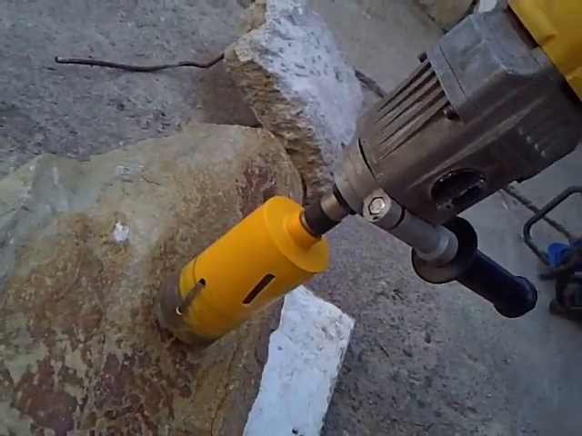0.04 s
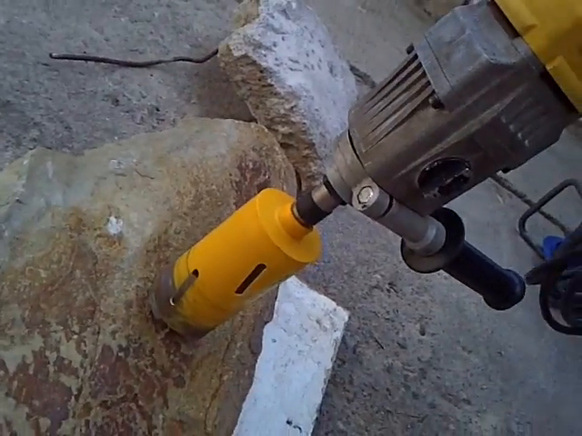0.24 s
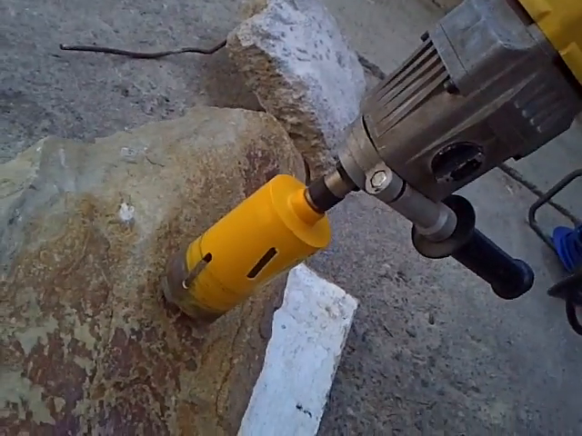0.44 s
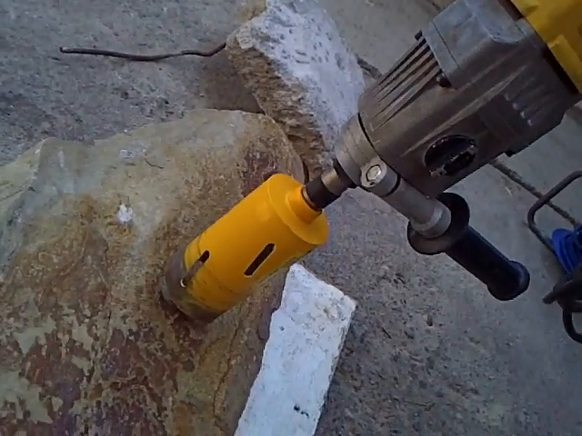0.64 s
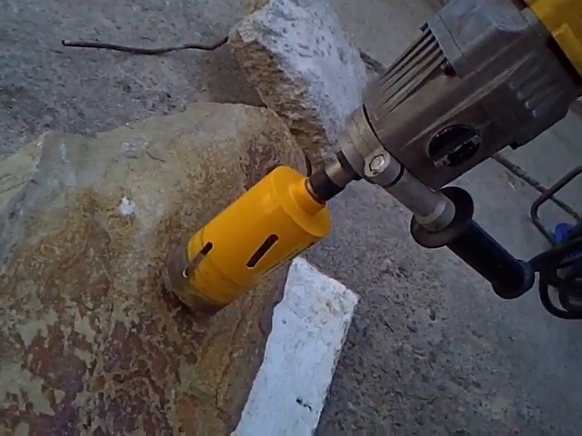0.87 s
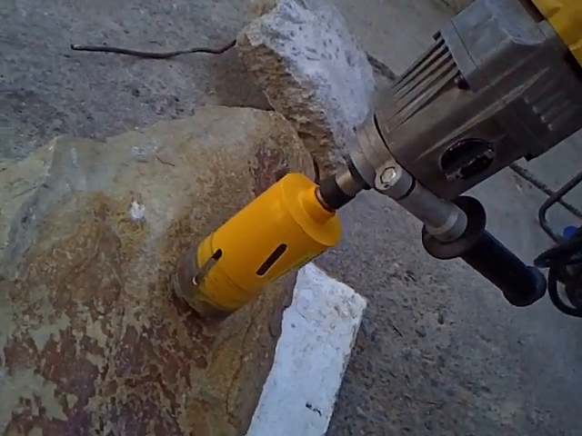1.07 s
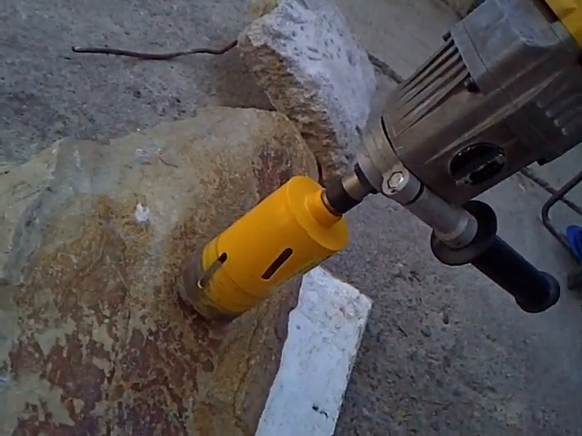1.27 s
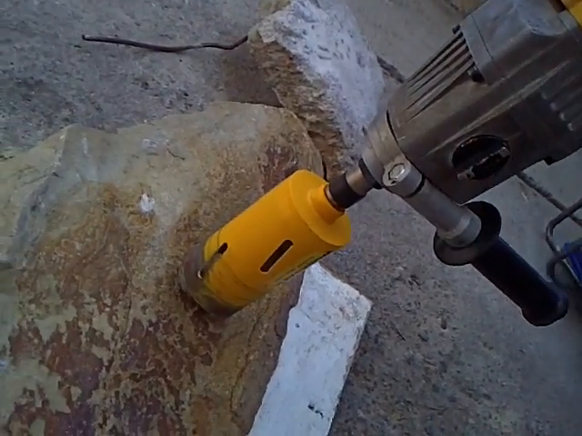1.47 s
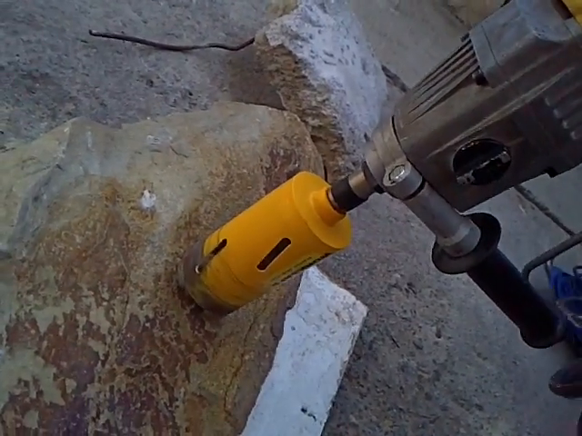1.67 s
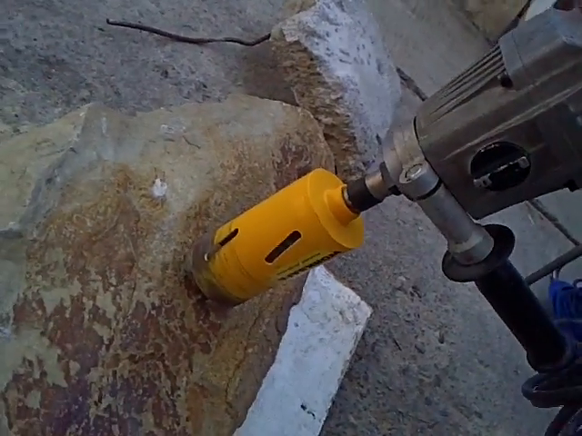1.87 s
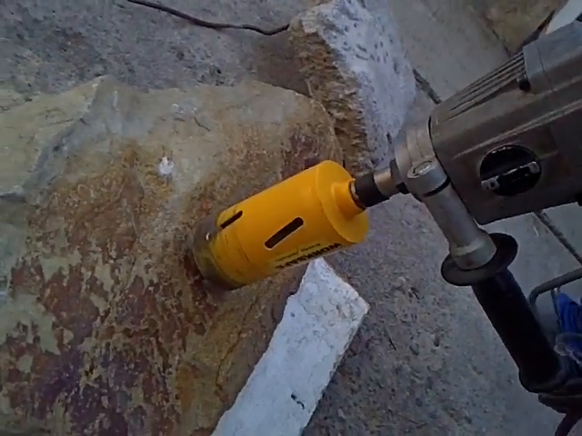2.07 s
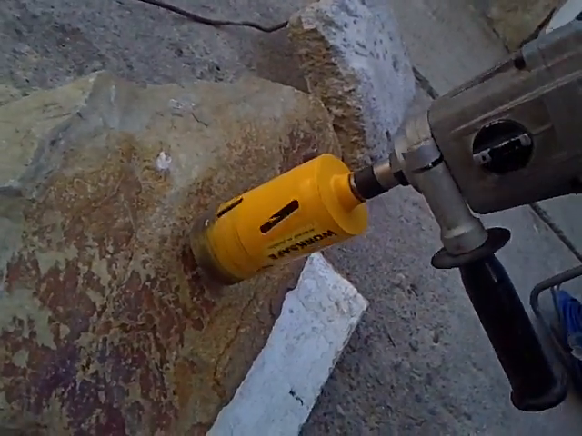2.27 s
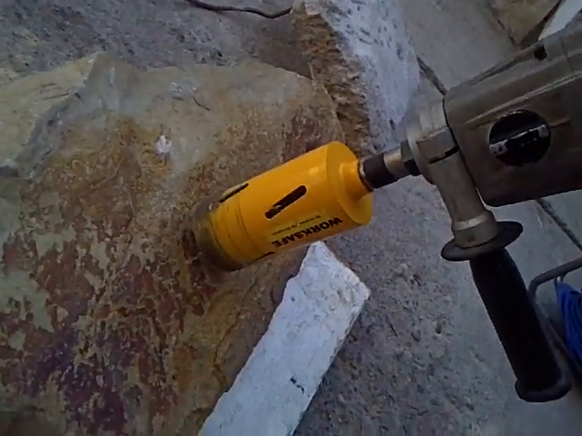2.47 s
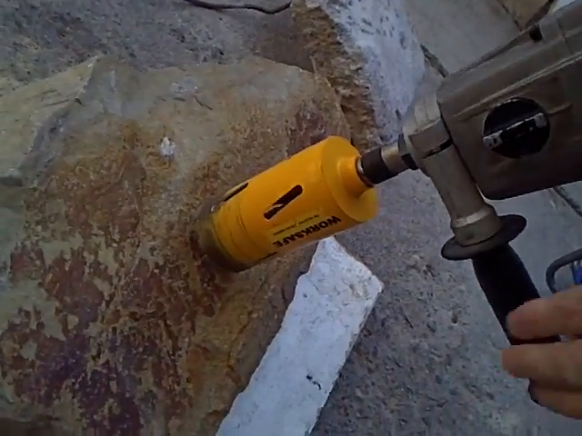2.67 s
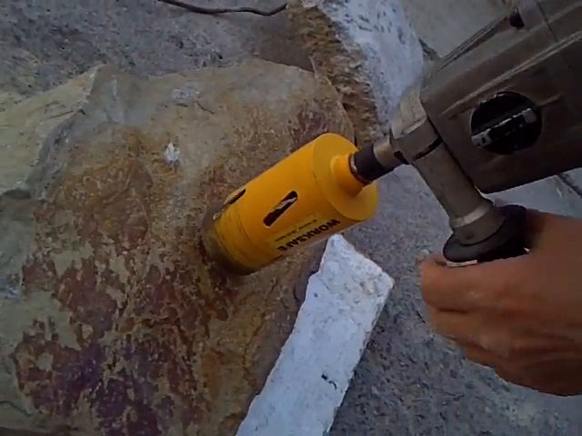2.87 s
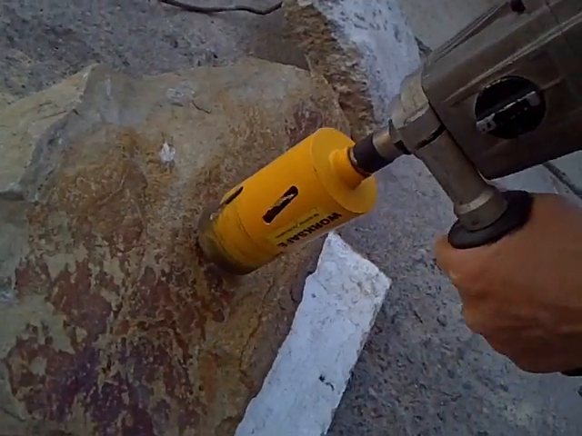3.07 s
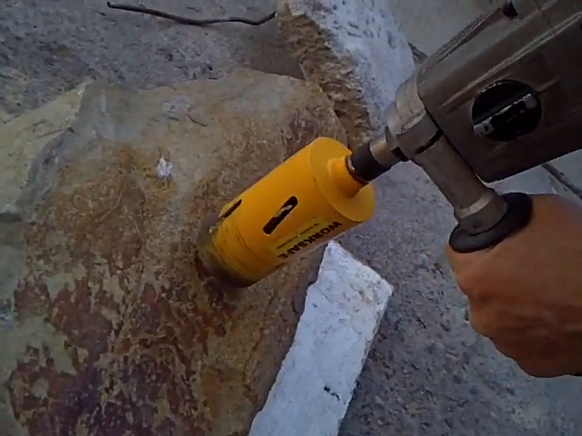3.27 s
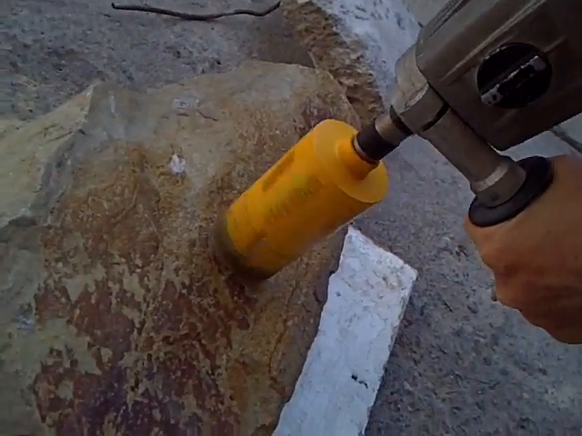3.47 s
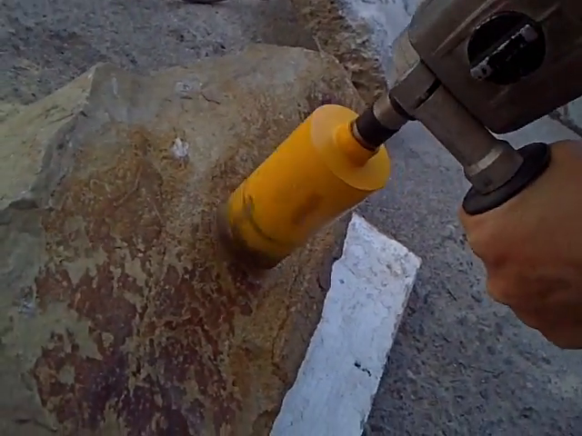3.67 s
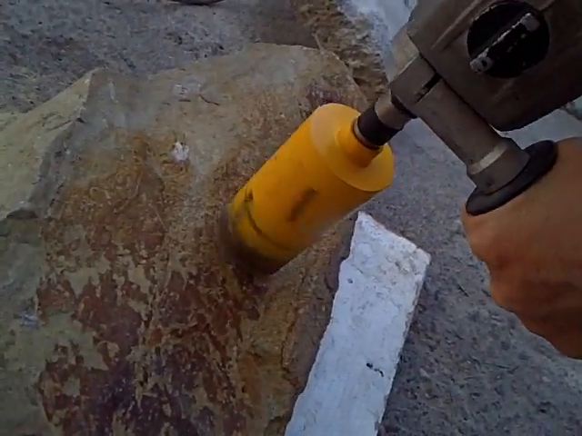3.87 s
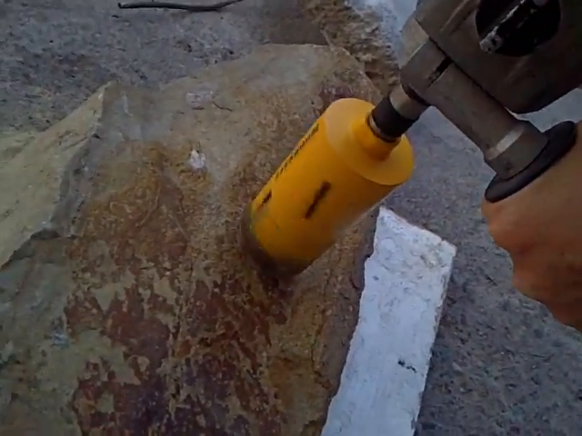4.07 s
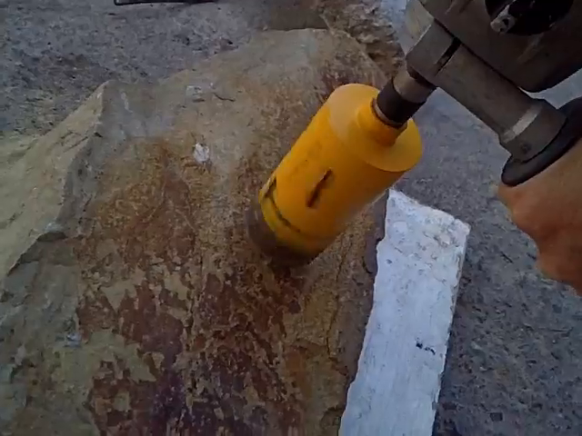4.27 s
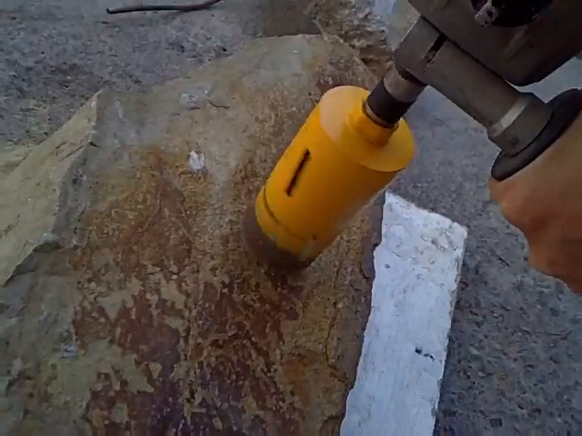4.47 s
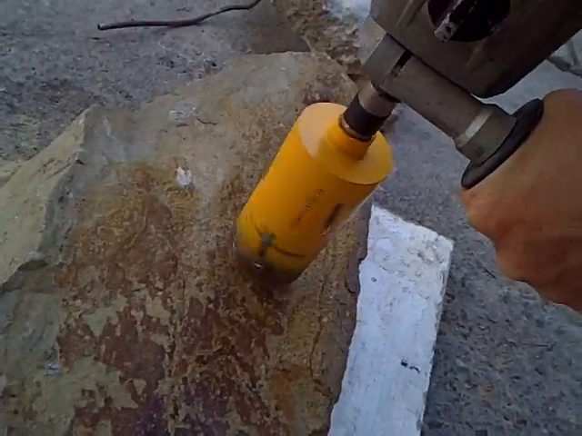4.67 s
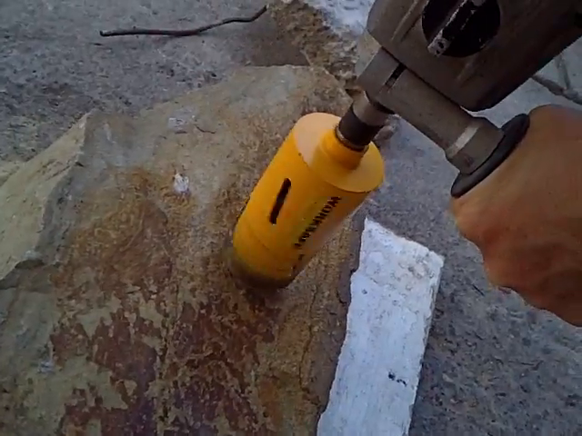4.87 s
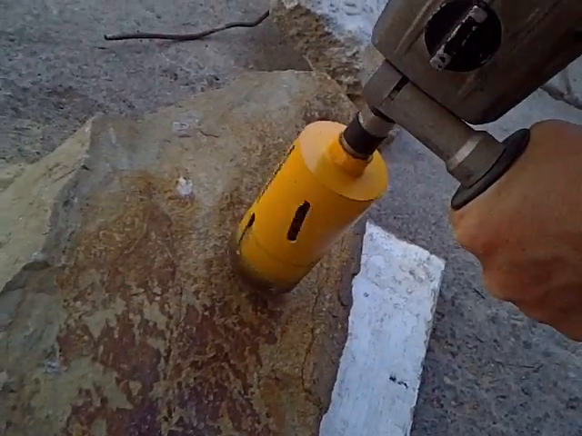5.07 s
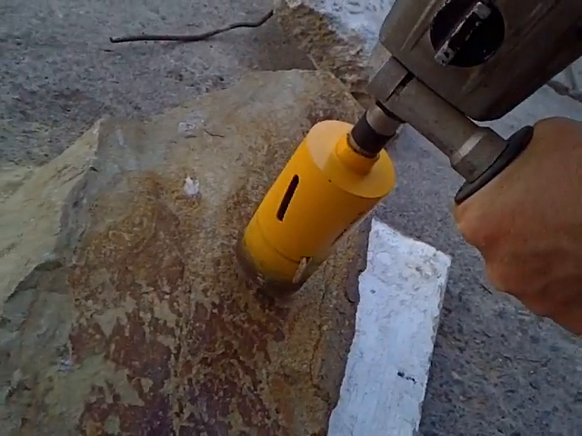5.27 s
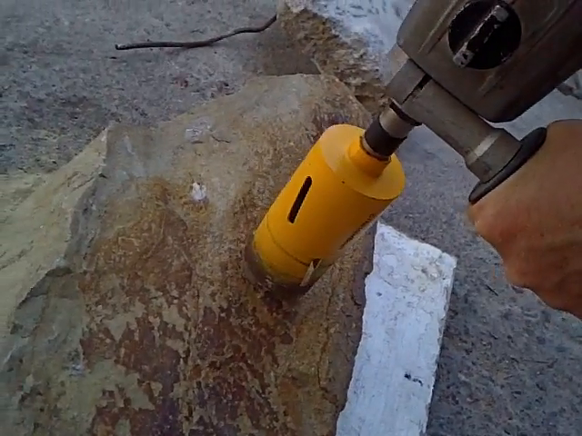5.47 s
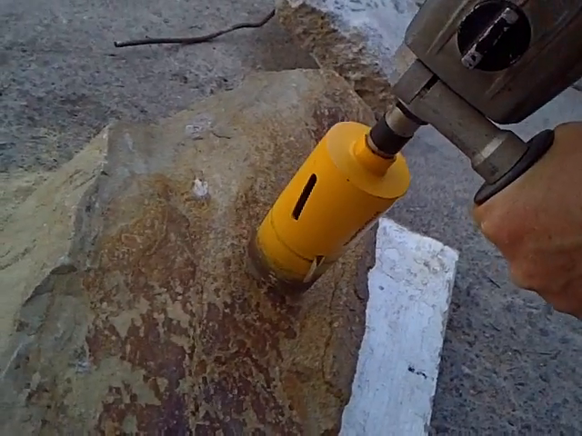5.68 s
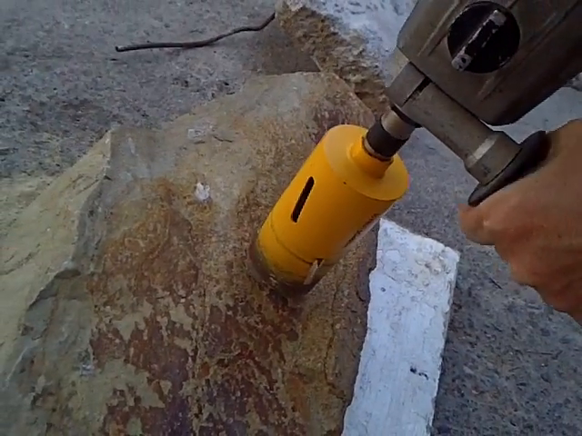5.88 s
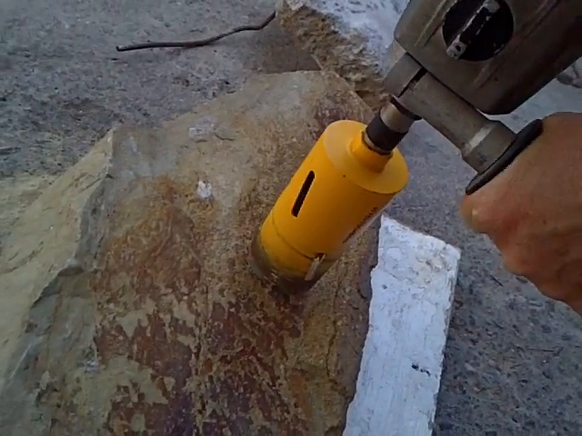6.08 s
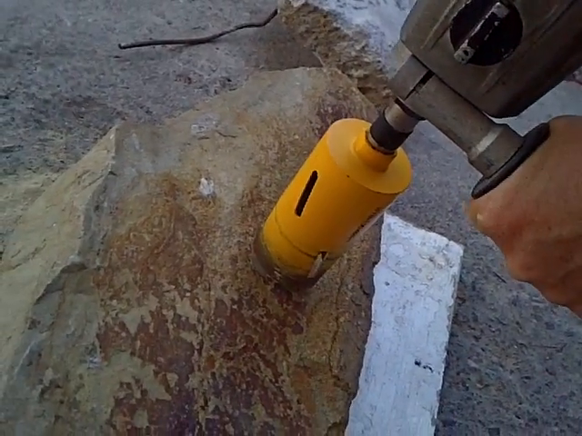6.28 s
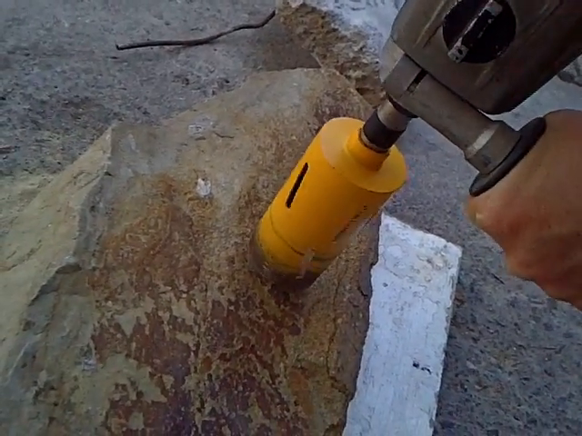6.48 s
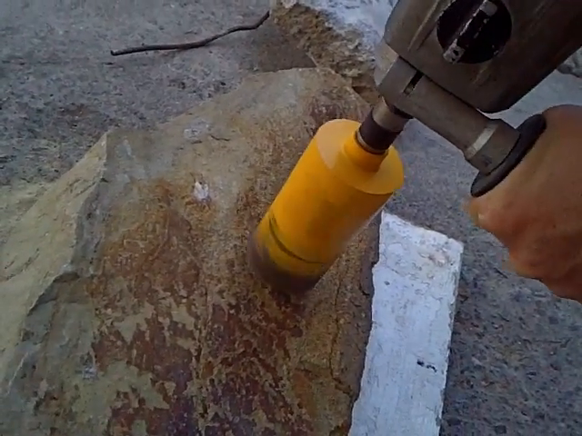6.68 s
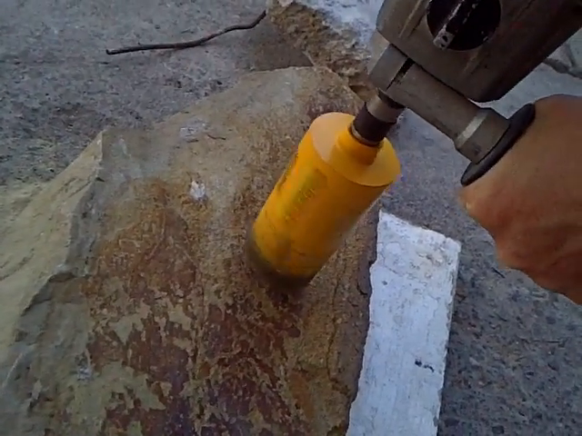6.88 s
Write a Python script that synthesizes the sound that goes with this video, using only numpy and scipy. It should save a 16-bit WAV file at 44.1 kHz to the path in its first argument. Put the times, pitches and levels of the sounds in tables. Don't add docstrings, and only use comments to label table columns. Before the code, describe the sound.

Dull thuds and stony scraping come first, with a sharp heavy clack and more grit and ticks as the tool is set down. Then a violent short burst of drilling, its whine climbing fast, gives way to a falling, rattling grind that breaks into separate bites and stops. Quiet yard hush, slight scrapes, then a second loud burst. Near microphone with dulled treble, overloading at the peaks.

```python
import sys
import numpy as np
from scipy import signal
from scipy.fft import rfft, irfft
from scipy.io import wavfile
from scipy.ndimage import uniform_filter1d

SR = 44100
rng = np.random.default_rng(int(sys.argv[2]) if len(sys.argv) > 2 else 0)


def log_audio(samples):
    frames = np.atleast_2d(samples).T
    limited = np.clip(frames, -1, 1)
    pcm = np.round(limited * 32767).astype(np.int16)
    wavfile.write(sys.argv[1], SR, pcm)


def natural_amplitude(level_db):
    exponent = np.asarray(level_db, float) / 20
    return 10 ** exponent


N = 305613
T = np.arange(N) / SR

# f/Hz, level/dB per Hz
AIR_SPECTRUM = [(20, 3.5), (60, 2), (180, -2.5), (280, -1.5), (540, -4), (950, -9), (1620, -12),
                (2260, -9.5), (3400, -28), (4200, -6.5), (6000, -17.5), (7500, -9), (10000, 4.5),
                (14000, 1.5)]
# f/Hz, level/dB
MIC_RESPONSE = [(20, -40), (90, -7), (150, 1), (4250, -1), (4600, 5), (5250, 0.5), (7000, -10),
                (10000, -18), (13000, -29.5), (15000, -41), (15600, -88)]
# f/Hz, width/Hz
MIC_NOTCHES = [(4780, 660), (5800, 1670), (8480, 2330), (12000, 1920), (14100, 250), (14800, 150)]

# f/Hz, width/Hz, level/dB
STONE_LOW = [(287, 142, -0.5), (436, 100, 1), (560, 54, 4), (751, 280, 0.5)]
# f/Hz, width/Hz, level/dB
STONE_HIGH = [(1090, 410, 7.5), (1423, 120, 10), (1716, 330, 7), (2122, 310, 5.5)]
# f/Hz, width/Hz, level/dB
SAND = [(2920, 1280, -1), (3490, 480, -9), (4170, 280, -1.5), (7500, 5700, -7)]

# t/s, peak level/dB, brightness/dB, t60/s
THUDS = [(0.255, -16.5, 4, 0.09), (0.273, -9, -8.5, 0.19), (0.309, -14.5, 1, 0.054),
         (0.333, -9, -2.5, 0.13), (0.359, -21, -8, 0.13), (0.389, -18, -9, 0.16), (0.473, -30.5, -25, 0.19),
         (0.604, -27, -14, 0.13), (0.668, -19.5, -4, 0.14), (0.701, -24.5, -6.5, 0.24),
         (0.885, -25.5, -13, 0.14), (0.926, -34, -35, 0.5), (1.107, -38.5, -4.5, 0.16),
         (1.12, -28.5, -20, 0.22)]
# f/Hz, level/dB, share of t60/1
CASE_MODES = [(153, 4.5, 0.93), (203, 1.5, 0.95), (349.6, 9, 0.69), (517, 4.5, 0.78), (780, -18, 0.16),
              (1094, -7, 0.41), (1760, -16, 0.28)]
# t/s, peak level/dB, ring f/Hz, crack level/dB
TICKS = [(0.148, -12, 1000, -7), (0.199, -31, 1020, -1), (0.827, -25, 1213, -1), (1.296, -27.5, 400, 3.5),
         (1.404, -24, 372, -16), (1.435, -18.5, 383, -11), (1.504, -19.5, 387, -22),
         (1.565, -19.5, 397, 5.5), (1.607, -11, 390, -19), (1.646, -18, 434, -13), (1.754, -24, 2920, 0),
         (1.985, -33.5, 1510, 9), (0.255, -19, 1790, 9), (2.121, -29, 3220, 2), (2.137, -22.5, 1560, -3),
         (2.163, -31.5, 3580, 2), (2.175, -35, 2170, -3), (2.201, -29, 3550, -5), (2.33, -24.5, 930, -9),
         (2.435, -32.5, 1030, 8), (3.029, -32.5, 1380, -6), (3.078, -24.5, 2870, -5), (3.207, -12, 2360, 1),
         (3.423, -29.5, 1690, 5), (2.198, -17.5, 1860, 5), (2.211, -14, 1500, -9), (2.258, -20, 1070, -10),
         (2.473, -20, 1460, -4.5), (2.491, -19, 1060, -9.5), (2.507, -16.5, 2300, 6.5),
         (2.653, -22.5, 820, 1.5), (2.665, -21, 1440, -10), (2.908, -29, 950, 2), (2.94, -19.5, 1000, 1),
         (3.062, -26.5, 2970, 2), (3.097, -25.5, 1340, -5), (3.139, -26.5, 3160, 3), (3.167, -26, 1350, 4),
         (3.182, -18.5, 954, 9), (3.207, -13.5, 943, -4), (3.2555, -32, 2080, -11), (3.292, -21, 2284, -10)]
# t/s, peak level/dB, ring f/Hz, crack level/dB
SNAGS = [
    (3.804, 3, 2060, -1),
    (4.481, -9, 1074, -17),
    (4.921, -14, 1940, -20),
    (4.932, -9, 1170, -3),
    (5.091, -14, 1105, -13),
    (5.132, -15, 1195, -32),
    (5.782, -35, 3920, 1),
    (5.875, -42, 3650, 6),
    (6.4, -34, 560, 3),
    (6.416, -30.5, 470, -3),
]
# t/s, peak level/dB, t60/s
KNOCK = [
    (1.753, -22, .03),
    (1.762, -8, 0.046),
    (1.766, 7.5, 0.039),
    (1.78, -8, 0.017),
    (1.797, -28, 0.049),
    (1.813, -4, 0.022),
    (1.838, -29.5, 0.12),
    (1.86, -32, 0.022),
    (1.93, -25.5, 0.025),
]
# f/Hz, level/dB
BLOCK_MODES = [(420, -6.5), (756, 4.5), (1180, -8.5), (1500, -15), (2250, -24.5), (2900, -19.5)]
# t/s, level/dB, f/Hz, t60/s
PINGS = [
    (3.455, -14, 5300, .2),
    (3.457, -8, 3520, .12),
    (3.612, -15, 5300, .12),
    (5.013, -16, 6600, .17),
    (5.121, -27, 5300, .2),
    (5.28, -39, 1023, 5.5),
    (5.786, -30, 7500, .03),
    (6.522, -28, 2050, .4),
    (6.625, -3, 2060, .2),
    (6.668, -5, 440, .25),
]
# t/s, peak level/dB
RIM_CHIPS = [
    (4.9703, -57),
    (5.0087, -51),
    (5.0646, -53),
    (5.103, -57),
    (5.1374, -57),
    (5.1823, -65),
    (5.2511, -58),
    (5.3514, -53),
    (5.4038, -58),
]
RIM_HZ, RIM_T60_S, RIM_DB = 7450, 0.07, 17

# t/s, fade/s per 20 dB, ringing level/dB, dull level/dB re ringing, sand level/dB re ringing
STROKES = [(0.001, 0.05, -28.5, -4.5, -1.5), (0.162, 0.32, -33.5, -7.5, -3), (0.262, 0.25, -41.5, -4, -23),
           (0.52, 2.5, -55.5, 2, 1.5), (0.723, 0.54, -49.5, -12, -3), (1.054, -7, -67, 6, -11),
           (1.3, 0.08, -37.5, -1, -9), (1.458, 0, -43, 7, -14), (1.484, 0.08, -43, 4.5, 0.5),
           (1.584, 0.29, -32.5, 3, -12), (1.769, 0.05, -17, -23, -20), (1.991, 0, -59, -13, 1),
           (2.125, 0.4, -39.5, -34, 0), (2.221, 0.38, -37.5, 2.5, -29), (2.511, -0.11, -38, 1.5, -2.1),
           (2.531, 0.2, -58.5, -1, -1.5), (2.664, 0.12, -36, -2, -6), (2.933, 0.1, -38, -6, -1.5),
           (3.186, 0.14, -29.5, -14, 6), (5.4, -0.5, -70.5, 3, -1), (5.88, 1.5, -58, 1.5, 0),
           (6.082, 0.07, -54.5, 7.5, -6), (6.172, 1.4, -53, -5, 1.5), (6.404, 0, -61, 6, -4.5)]
# t/s, build/s per 20 dB, ringing level/dB, dull level/dB re ringing, sand level/dB re ringing
SWELLS = [(0.157, 0.15, -30.5, -9.5, -1.5), (1.29, 0.1, -55, 7, -13), (1.453, 0.077, -51.5, 12, -17),
          (1.749, 0.24, -35, 1.5, -29), (1.759, 0.0086, -35, -9.5, 14.5), (2.216, 0.049, -38, 7, -19),
          (2.5, 0.34, -49, -2, 8), (2.927, 0.033, -38, -1, -2), (3.165, 0.24, -45.5, -23, 13.5),
          (3.44, 0.018, -31.5, -11, -22), (5.86, 0.66, -63, 2, 14), (6.05, 0.16, -60, -7, 7)]

# first kick t/s, off t/s, kick depth level/dB
TRIGGERS = [
    (3.4415, 3.635, 23),
    (6.5297, 6.745, 24),
]
KICK_HZ = 101.6
# t/s, f/Hz
MESH_RUNS = [
    [(3.44, 350), (3.53, 1050), (3.56, 1400), (3.608, 2190), (3.655, 2190), (3.8, 1960), (3.9, 1755),
     (4.25, 1285), (4.42, 1090), (4.58, 865), (4.95, 330), (5.4, 40)],
    [(6.52, 40), (6.6, 600), (6.64, 1000), (6.66, 1170), (6.69, 1820), (6.715, 2120), (6.75, 2430),
     (6.8, 2400), (6.93, 2150)],
]
# t/s, level/dB
LOAD_RUNS = [
    [(3.44, -27), (3.45, -12), (3.57, -18.5), (3.64, -14), (3.9, -12), (4.72, -14.5), (5.0, -21.5),
     (5.25, -33), (5.45, -60)],
    [(6.51, -69), (6.565, -29.5), (6.61, -21), (6.658, -10), (6.70, -15.5), (6.754, -12.5), (6.82, -12.5),
     (6.93, -11)],
]
# t/s, extra level/dB
JOLTS = [(3.448, 5.5), (3.503, 6.5), (3.546, 3), (3.554, 2.5), (3.577, 4), (3.593, 1.5), (3.612, 2),
         (3.789, 2), (3.804, 2), (3.882, 1), (4.918, 2), (5.138, 3.5), (6.562, 3), (6.57, 5.5),
         (6.581, 4.5), (6.667, 3), (6.704, 2)]
JOLT_RISE_S, JOLT_FALL_S = 0.0046, 0.015
# t/s, peak level/dB
BITES = [(4.1954, 5), (4.2204, -3), (4.2502, -5), (4.2687, -0.5), (4.2945, -6.5), (4.324, -3.5),
         (4.3542, -9.5), (4.38, -6.5), (4.4049, -6), (4.4328, -1), (4.4496, -7), (4.4612, -3), (4.4852, -9),
         (4.5196, -1.5), (4.5445, -16), (4.555, -4.5), (4.5975, -5.5), (4.6188, -0.5), (4.644, -7),
         (4.6653, -6.5), (4.696, -15), (4.7326, -13.5), (4.767, -30.5), (4.7975, -12.5), (4.8578, -16),
         (4.8643, -15), (4.8884, -7.5), (4.9002, -13), (4.9224, -5.5), (4.9338, -5), (4.9514, -6),
         (4.971, -9.5), (5.0135, -16), (5.0384, -12), (5.0647, -15), (5.0926, -19.5), (5.1326, -28.5),
         (5.1327, -26.5), (5.1397, -21.5), (5.1775, -19), (5.183, -31.5), (5.2458, -32), (5.312, -26.5)]
SLACK_S = [
    3.6548,
    3.8314,
    6.751,
]
# share of turn/1, level at full speed/dB, gain on slowing/dB per octave
TURN_KNOCKS = [
    (0, 17, -3),
    (.36, 6, 12),
    (.62, -4, 16),
]
TEETH = 31
# multiple of mesh/1, level/dB
WHINE_PARTIALS = [(1, 0), (1.69, -5), (2.12, 3), (3.16, 7), (3.65, 2), (4.17, 3)]
# mesh f/Hz, level/dB re grind
WHINE_DRIVEN = [(350, -25), (800, -17), (1000, -10), (1400, -8), (1780, 1), (1960, 3), (2120, -6)]
# mesh f/Hz, level/dB re grind
WHINE_COASTING = [(40, -30), (235, -14), (330, -16), (700, -30), (870, -17), (1130, -15), (1300, -13),
                  (1900, -15), (2130, -10), (2300, -8)]
# f/Hz, level/dB per Hz
FAN_SPECTRUM = [(3000, -45.5), (5250, -2), (6500, 0), (7500, 2), (9500, -3.5), (11000, -9.5), (13500, -4),
                (16000, -3)]
# f/Hz, level/dB per Hz
BODY_SPECTRUM = [(24, -80), (40, -53), (85, -40), (123, -20), (330, -13.5), (433, -8.5), (506, -4.5),
                 (775, -1), (905, -5), (1330, 4), (1590, -3), (2160, -3.5), (3380, -18), (4100, -22),
                 (5330, -51), (9020, -120)]
# f/Hz, level/dB, t60/s
GEARBOX_MODES = [(1276, -11.5, 0.063), (1882, 0.5, 0.028)]
# f/Hz, level/dB, t60/s
BIT_MODES = [(1165, -13, 0.02), (1500, -20, 0.012), (2110, -10.5, 0.022)]
# f/Hz, level/dB, t60/s
BARREL_MODES = [(446.3, -13.5, 0.22), (1212, -20.5, 0.11), (2068, -11, 0.012), (3350, -20, 0.018),
                (5290, -27, 0.081), (7430, -20, 0.032)]
FULL_MESH_HZ, LOW_MESH_HZ = 2200, 1280
TREBLE_DB, TREBLE_DB_PER_OCTAVE, TREBLE_LEAST_DB = 3, 8.5, -13
FAN_DB, FAN_DB_PER_OCTAVE, FAN_DRIVEN_DB = -48.5, 6.5, 5.5


def level(x, db):
    return x * natural_amplitude(db) / np.sqrt(np.mean(x ** 2))


def shape(x, points, notches=()):
    hz = np.linspace(1, SR / 2, 4097)
    points_hz, points_db = np.array(points).T
    log = np.interp(np.log(hz), np.log(points_hz), points_db) * np.log(10) / 20
    for centre_hz, width_hz in notches:
        off = (hz - centre_hz) ** 2 + 100
        log = log + 0.5 * np.log(off / (off + width_hz ** 2))
    fold = np.r_[1, 2 * np.ones(4095), 1, np.zeros(4095)]
    response = irfft(np.exp(rfft(irfft(log) * fold)))
    return signal.fftconvolve(x, response[:4096])[:N]


def slow_noise(size):
    return level(uniform_filter1d(rng.standard_normal(N), size=size), 0)


def mode(x, hz, t60_s):
    r, w = np.exp(-np.log(1000) / (t60_s * SR)), 2 * np.pi * hz / SR
    return signal.lfilter([0, r * np.sin(w)], [1, -2 * r * np.cos(w), r * r], x)


def bands(x, peaks):
    out = 0
    for hz, width_hz, db in peaks:
        b, a = signal.iirpeak(hz, hz / width_hz, SR)
        once = signal.lfilter(b, a, x)
        out = out + natural_amplitude(db) * signal.lfilter(b, a, once)
    return level(out, 0)


def decay(x, tail_s):
    return signal.lfilter([1], [1, -np.exp(-1 / (tail_s * SR))], x)


def grit(rate_hz, spread_db, tail_s):
    struck = rng.random(N) < rate_hz / SR
    size_db = spread_db * np.minimum(rng.exponential(size=N), 2.5)
    return decay(struck * natural_amplitude(size_db), tail_s)


def add_ring(out, s, db, hz, t60_s, rise_s):
    i = int(s * SR)
    t = np.arange(int(abs(t60_s) * SR) + 2) / SR
    env = natural_amplitude(db) * (1 - np.exp(-t / rise_s)) * np.exp(-np.log(1000) * t / abs(t60_s))
    ring = env * np.sin(2 * np.pi * hz * t)
    out[i:i + len(t)] += ring[:N - i]


def burst(s, db, t60_s):
    env, i = np.zeros(N), int(s * SR)
    t = T[:min(int(abs(t60_s) * SR), N - i)]
    env[i:i + len(t)] = natural_amplitude(db) * np.exp(-np.log(1000) * t / abs(t60_s))
    return env


def peak(s, rise_s, fall_s):
    return natural_amplitude(-20 * np.where(T < s, (s - T) / abs(rise_s), (T - s) / abs(fall_s)))


def curve(runs):
    s, value = np.concatenate(runs).T
    live = sum((T >= run[0][0]) & (T <= run[-1][0]) for run in runs) > 0
    return live, np.interp(T, s, value)


def air():
    swell_db = 0.5 * slow_noise(9000)
    noise = rng.standard_normal(N)
    low = [p for p in AIR_SPECTRUM if p[0] < 4300] + [(4400, -91.0)]
    return shape(noise, AIR_SPECTRUM) / np.std(shape(noise, low)) * natural_amplitude(-47 + swell_db)


def yard(near):
    t = np.arange(6000) / SR
    echo = rng.standard_normal(6000) * np.exp(-np.log(1000) * t / 0.45) * (t > 0.004)
    return natural_amplitude(-43) * signal.fftconvolve(near, echo)[:N]


def knocks():
    out, cracks, rattle = np.zeros((3, N))
    detune = 1 + 0.025 * rng.standard_normal((len(THUDS) + len(KNOCK), len(CASE_MODES)))
    for (s, db, bright_db, t60_s), ratios in zip(THUDS, detune):
        rattle += burst(s, db - 14.5, 1.15 * t60_s)
        for k, (hz, mode_db, share) in enumerate(CASE_MODES):
            ring_db = db - 11 + mode_db + (bright_db + 8.0) * k / 3
            add_ring(out, s, ring_db, hz * ratios[k], t60_s * share, 0.001)
    tick_t60_s = 0.05
    for s, db, hz, crack_db in TICKS + SNAGS:
        add_ring(out, s, db - 3.5, hz, 0.8 * tick_t60_s, 0.0004)
        cracks += burst(s, db + crack_db - 11.5, tick_t60_s)
    for (s, db, t60_s), ratios in zip(KNOCK, detune[::-1]):
        rattle += burst(s, db - 21, 3.5 * t60_s)
        cracks += burst(s, db - 24, 2.06 * t60_s)
        for (hz, mode_db), ratio in zip(BLOCK_MODES, ratios):
            add_ring(out, s, db + mode_db, hz * ratio, 0.7 * t60_s, 0.002)
    for s, db, hz, t60_s in PINGS:
        add_ring(out, s, db - 10.0, hz, t60_s, 0.001)
    for s, db in RIM_CHIPS:
        add_ring(out, s, db + RIM_DB, RIM_HZ, RIM_T60_S, 0.001)
    out += rattle * bands(rng.standard_normal(N), STONE_LOW)
    return out + cracks * bands(rng.standard_normal(N), STONE_HIGH + SAND[:1])


def scrape():
    edge_s = 0.012
    shapes = [(peak(s, edge_s, fade_s), row) for s, fade_s, *row in STROKES]
    shapes += [(peak(s, build_s, edge_s), row) for s, build_s, *row in SWELLS]
    push = np.zeros((3, N))
    for env, (db, dull_db, sand_db) in shapes:
        push += env * natural_amplitude(db + np.array([[dull_db], [0], [sand_db]]))
    grains = grit(140, 5.3, 0.0019)
    dull = bands((1 + 0.3 * grit(60, 9.5, 0.0062)) * rng.standard_normal(N), STONE_LOW)
    bright = bands((1 + 0.31 * grains) * rng.standard_normal(N), STONE_HIGH)
    sand = bands((1 + 1.0 * grains) * rng.standard_normal(N), SAND)
    return push[0] * dull + natural_amplitude(-0.5) * push[1] * bright + natural_amplitude(-1.0) * push[2] * sand


def motor_kicks():
    kick, power, blows = np.ones(N), np.zeros(N), np.zeros(N)
    uneven = rng.standard_normal(2000)
    for start_s, stop_s, depth_db in TRIGGERS:
        live = (T >= start_s) * np.clip((stop_s - T) / 0.035, 0, 1)
        cycle = np.maximum(T - start_s, 0) * KICK_HZ
        size = live * natural_amplitude(depth_db + 1.5 * uneven[cycle.astype(int)])
        x = cycle % 1 / 0.14
        kick += size * x * np.exp(-x)
        blows += 5 * size * np.diff(np.floor(cycle + 0.95), prepend=0)
        power += live
    kick += natural_amplitude(16) * peak(6.655, 0.03, 0.02)
    return kick, power, blows


def layshaft_taps(mesh_hz, octaves, power, grind_db):
    uneven = rng.standard_normal(2000)
    turn = np.cumsum(mesh_hz) / TEETH / SR
    taken = np.interp(SLACK_S, T, turn)
    turn = turn - taken[np.maximum(np.searchsorted(SLACK_S, T) - 1, 0)] + 100
    coasting = (1 - power) * (mesh_hz > LOW_MESH_HZ)
    taps = np.zeros(N)
    for k, (share, db, slowing_db) in enumerate(TURN_KNOCKS):
        count = np.floor(turn - share)
        size_db = np.minimum(db - slowing_db * octaves, 16) + 1.8 * uneven[count.astype(int) + 300 * k]
        taps += coasting * natural_amplitude(size_db) * (np.diff(count, prepend=0) > 0)
    for s, db in BITES:
        i = int(s * SR)
        taps[i] += natural_amplitude(db - grind_db[i] + 4.5)
    return taps


def gear_whine(mesh_hz, power, gate):
    driven_db = np.interp(mesh_hz, *zip(*WHINE_DRIVEN))
    coasting_db = np.interp(mesh_hz, *zip(*WHINE_COASTING))
    whine_db = power * driven_db + (1 - power) * coasting_db
    wobble = natural_amplitude((0.025 + 0.12 * power) * slow_noise(300))
    phase = 2 * np.pi * np.cumsum(mesh_hz * wobble) / SR
    faint_db = 7 * power - 1 + 30 * np.log2(np.maximum(830 / mesh_hz, 1))
    whine = np.zeros(N)
    for multiple, db in WHINE_PARTIALS:
        whine += natural_amplitude(db - 3 + 2 * power - (multiple > 1) * faint_db) * np.sin(multiple * phase)
    whine *= natural_amplitude(whine_db) * gate ** (0.75 + 1.1 * power)
    return whine * natural_amplitude((1.5 + 1.5 * power) * slow_noise(500))


def drill():
    mesh_hz = curve(MESH_RUNS)[1]
    on, grind_db = curve(LOAD_RUNS)
    for s, db in JOLTS:
        grind_db = grind_db + db * peak(s, 2.3 * JOLT_RISE_S, 2.3 * JOLT_FALL_S)
    octaves = np.log2(mesh_hz / FULL_MESH_HZ)
    kick, power, blows = motor_kicks()
    taps = layshaft_taps(mesh_hz, octaves, power, grind_db)

    shy_db = power * np.minimum(grind_db + 12, 0)
    treble_db = np.maximum(TREBLE_DB + TREBLE_DB_PER_OCTAVE * octaves, TREBLE_LEAST_DB) + 0.6 * shy_db
    fan_db = 0.84 * shy_db + FAN_DB + FAN_DB_PER_OCTAVE * octaves + FAN_DRIVEN_DB * power

    grains = (0.45 + 0.75 * (mesh_hz < LOW_MESH_HZ)) * grit(220, 3, 0.0015)
    beat = kick + decay(taps, 0.0035) + grains
    noise = rng.standard_normal(N)
    rasp = beat * noise + 2.0 * taps + 0.073 * blows
    norm = np.sqrt(uniform_filter1d(rasp ** 2, size=3000))
    rasp /= norm
    gate = beat / np.sqrt(uniform_filter1d(beat ** 2, size=3000))
    whine = gear_whine(mesh_hz, power, gate)

    body = BODY_SPECTRUM[:-2] + [(5000, -44.0), (7000, -31.5)]
    sound = shape(rasp + whine, body) / np.std(shape(rasp, body))
    for hz, db, t60_s in GEARBOX_MODES:
        sound += natural_amplitude(db - 18.5) * mode(blows / norm, hz, t60_s)
    for k, (hz, db, t60_s) in enumerate(BIT_MODES):
        uneven_taps = taps / norm * natural_amplitude(2.3 * np.roll(noise, k + 1))
        sound += natural_amplitude(db) * mode(uneven_taps, hz, t60_s)
    ceiling = 4.5 + 10 * power
    sound = ceiling * np.tanh(sound / ceiling)

    top = signal.sosfilt(signal.butter(2, 2600, "high", fs=SR, output="sos"), sound)
    push = on * natural_amplitude(grind_db)
    sound = push * (sound + (natural_amplitude(0.5 * (treble_db + 14)) - 1) * top)
    fan = level(shape(np.sqrt(gate) * rng.standard_normal(N), FAN_SPECTRUM), 0)
    sound += on * natural_amplitude(fan_db + 30.5) * fan
    for hz, db, t60_s in BARREL_MODES:
        sound += natural_amplitude(db) * mode(push * rasp, hz, t60_s) * np.sqrt(20 / (t60_s * SR))
    return sound


def scene():
    near = knocks() + scrape() + drill()
    return (near + yard(near) + air())[None]


def band_limit(x):
    return signal.sosfilt(signal.butter(12, 15600, fs=SR, output="sos"), x)


def record(dry):
    mix = np.clip(shape(dry[0], MIC_RESPONSE, MIC_NOTCHES), -1, 1)
    return band_limit(mix[None])


dry = scene()
out = record(dry)
log_audio(out)
```